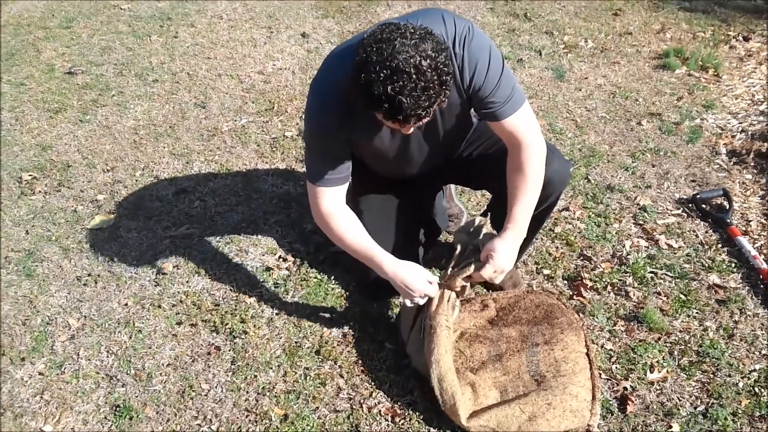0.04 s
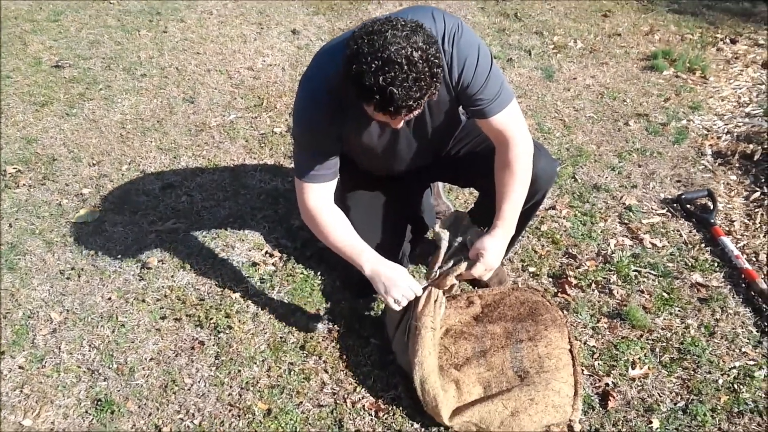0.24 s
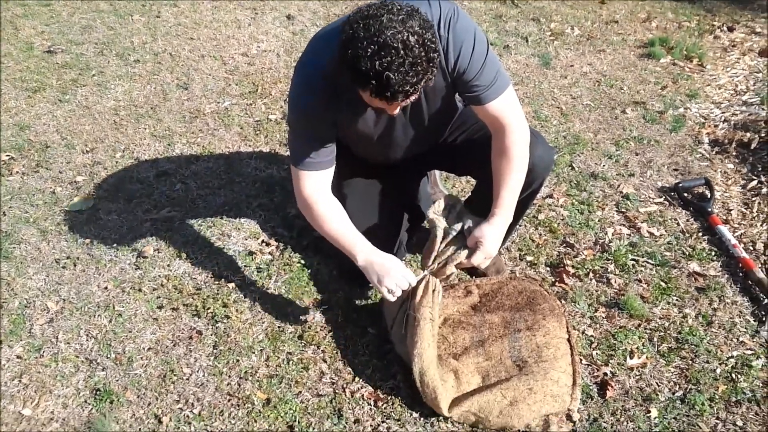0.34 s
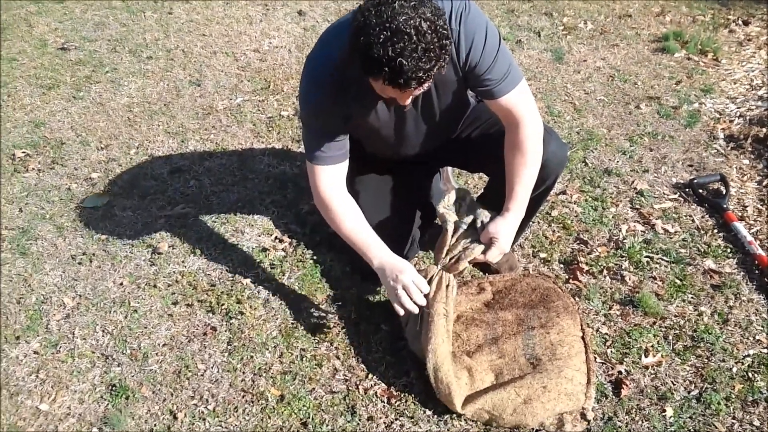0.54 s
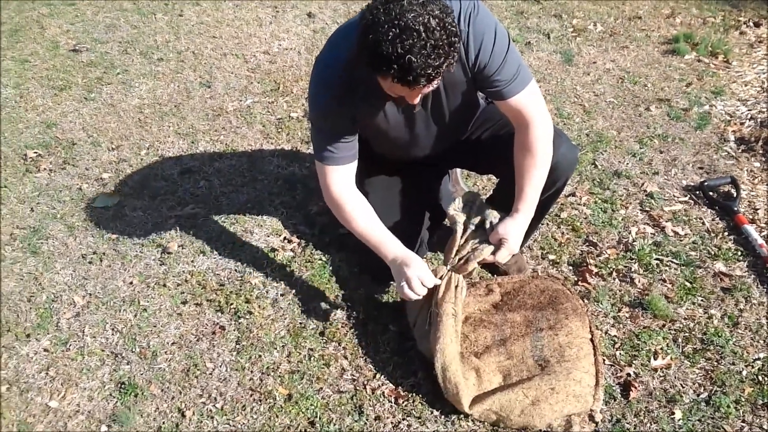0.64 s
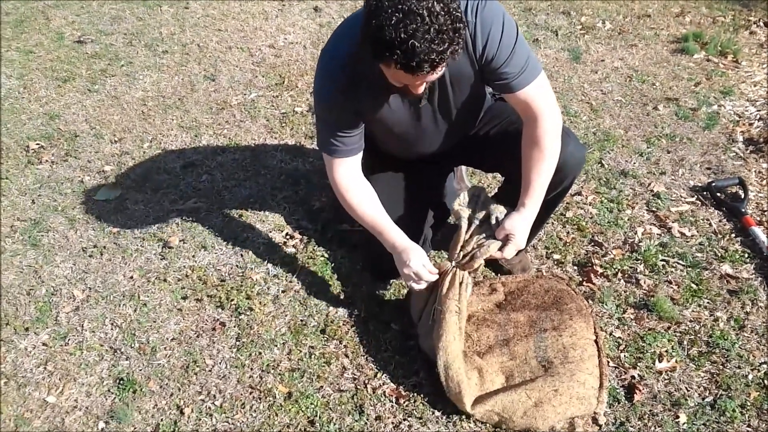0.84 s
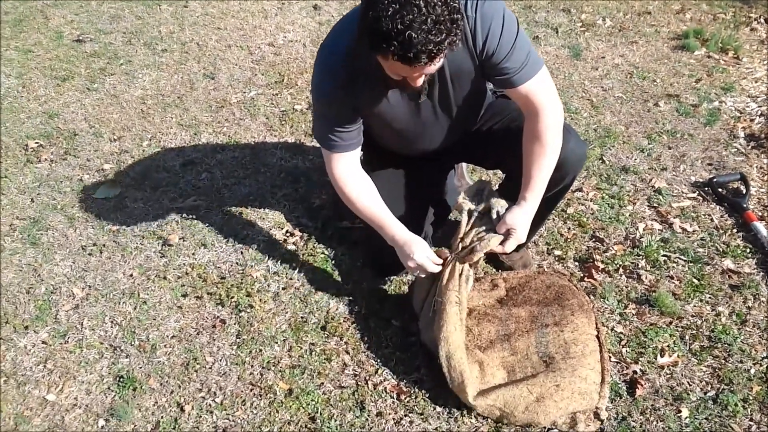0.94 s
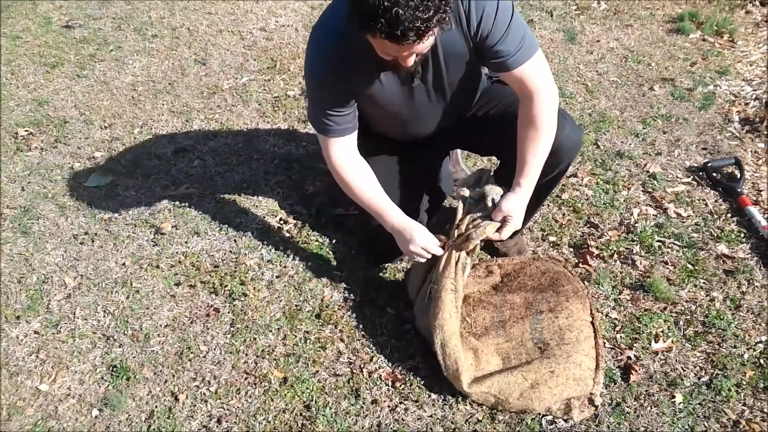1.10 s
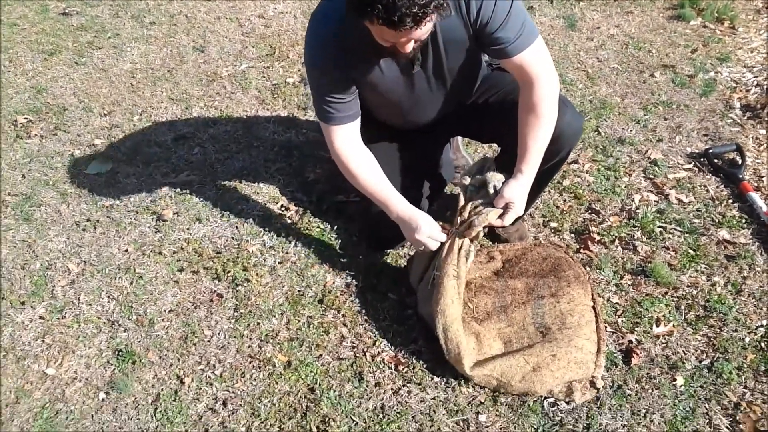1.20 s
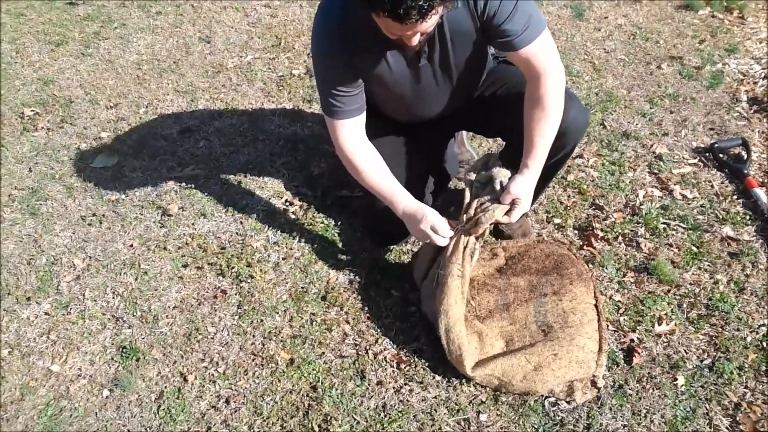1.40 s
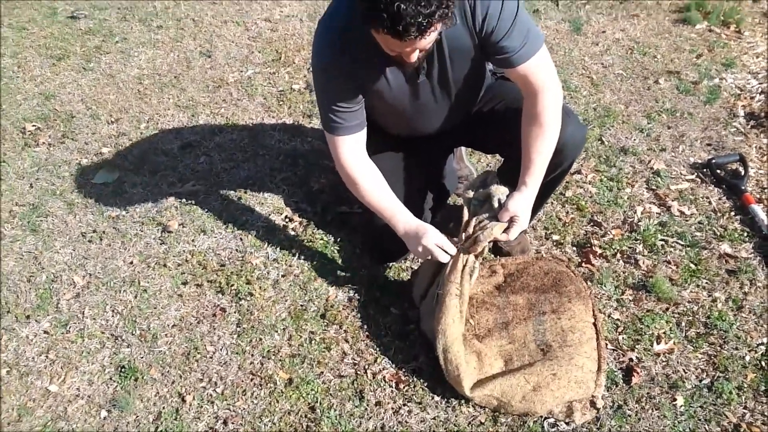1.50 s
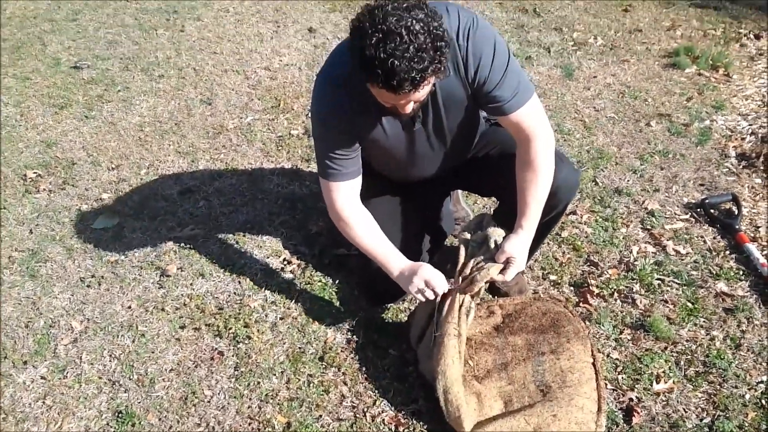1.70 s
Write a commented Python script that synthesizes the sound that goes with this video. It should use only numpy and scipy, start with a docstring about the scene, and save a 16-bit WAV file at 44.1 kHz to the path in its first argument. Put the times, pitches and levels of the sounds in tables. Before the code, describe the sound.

Two hard, hollow knocks hit the microphone on the left at about 0.2 and 0.3 seconds, with a rub along its body until 0.5. A burlap sack rustles faintly up close throughout, with a few light taps on the microphone. Distant birds whistle and trill from 0.5 seconds, and a nearer bird gives four quick, raspy chirps between 1.0 and 1.5, the last very faint. A light breeze rumbles underneath.

```python
"""Two hard knocks ring the microphone's housing while a burlap sack is gathered and tied on dry grass.
Something rubs along the housing's left side; then the cloth rustles faintly, fibre slipping over fibre,
with a few light taps on the housing. Birds whistle, trill and slur, echoing among the trees,
and a light breeze rumbles on the microphone."""
import sys
import numpy as np
from scipy import signal
from scipy.fft import rfft, irfft
from scipy.io import wavfile

SR = 44100
rng = np.random.default_rng(int(sys.argv[2]) if len(sys.argv) > 2 else 0)


def wrap_up_sound(samples):
    """Save the sound to the file named by the first command line argument, as 16-bit audio."""
    columns = np.atleast_2d(samples).T
    # keep every value between -1 and 1, then stretch to whole-number steps
    tamed = np.clip(columns, -1, 1)
    steps = np.round(tamed * 32767).astype(np.int16)
    wavfile.write(sys.argv[1], SR, steps)


N = 77175
T = np.arange(N) / SR
CUTOFF_HZ = 15900


def from_db(db):
    """Decibels to gain."""
    return 10 ** (np.asarray(db) / 20)


def rms_one(x):
    """Scale to an rms of 1."""
    return x / np.sqrt(np.mean(x ** 2) + 1e-20)


def in_time(rows, t=T):
    """Join timed breakpoints by straight lines: one curve for each column after the time."""
    times, *columns = np.transpose(rows)
    return [np.interp(t, times, column) for column in columns]


def panned(left_db):
    """Constant-power stereo gains, the left louder than the right by left_db."""
    ratio = from_db(np.atleast_1d(left_db))
    return np.array([ratio, np.ones_like(ratio)]) * np.sqrt(2 / (1 + ratio ** 2))


def drift(per_s):
    """A random wander of rms 1 that heads for a new value per_s times a second."""
    points = rng.standard_normal(4000)
    return rms_one(np.interp(T * per_s, np.arange(len(points)), points))


def coloured(x, colour):
    """Shape a signal with an EQ curve, rolled off below 20 Hz; rms 1."""
    hz, db = np.transpose(colour)
    bins_hz = np.maximum(np.fft.rfftfreq(N, 1 / SR), 1)
    gain = from_db(np.interp(np.log(bins_hz), np.log(hz), db))
    return rms_one(irfft(rfft(x) * gain * bins_hz / np.hypot(bins_hz, 20), N))


def noise(shared):
    """Stereo white noise with a share of its power common to both sides."""
    return np.sqrt(shared) * rng.standard_normal(N) + np.sqrt(1 - shared) * rng.standard_normal((2, N))


def grains(per_s, spread_db):
    """Friction as tiny slips of uneven size, partly shared by both channels."""
    shape = (3, N)  # left, right, centre
    size = from_db(spread_db * np.minimum(rng.exponential(1, shape), 5))
    slips = (rng.random(shape) < per_s / SR) * size * rng.choice([-1, 1], shape)
    return slips[:2] + .5 * slips[2]


def decay(start, t60):
    """An envelope that jumps to 1 at start and falls 60 dB in t60 seconds."""
    return (T >= start) * from_db(-60 * np.clip((T - start) / t60, 0, 4))


def ring(start, hz, t60):
    """A struck mode; low modes start a little later."""
    onset = start + 0.023 / hz
    return np.sin(2 * np.pi * hz * (T - onset)) * decay(onset, t60)


def tree_echoes(x, t60, build_s=0.004):
    """Diffuse echoes from the trees, different on each side."""
    tail = rng.standard_normal((2, N)) * decay(0, t60) * (1 - np.exp(-T / build_s))
    return signal.fftconvolve(x[None], tail / np.sqrt(np.sum(tail ** 2) / 2), axes=1)[:, :N]


def rumble_and_air():
    """Low rumble on the microphone: the rub's left-side bumps, then light gusts, over quiet open air."""
    # The rumble's envelope. Each row: time in seconds, level in dB, left over right in dB.
    envelope = [(0, -60.5, 2), (0.19, -60, -1), (0.30, -35, 22), (0.375, -34, 18), (0.42, -50.5, -8),
                (0.51, -52, -0.5), (0.58, -52.5, 2), (0.68, -54.5, 1), (1.0, -55, 9), (1.1, -48.5, 0),
                (1.21, -44, 7.5), (1.35, -59.5, 3), (1.61, -52, 9.5), (1.675, -34.5, 13), (1.715, -50.5, 2),
                (1.75, -59, 4.5)]
    # EQ curves of the rumble and of the air. Each row: frequency in Hz, gain in dB.
    rumble_colour = [(20, -0.5), (55, 4.5), (85, 1), (125, -5.5), (180, -11.5), (300, -26.5), (700, -37.5),
                     (2000, -68), (16000, -104.5)]
    air_colour = [(30, -13.5), (120, 10), (250, 7.5), (500, 4), (1000, -6), (2000, -13), (4500, -11.5),
                  (8000, -11.5), (11000, -11.5), (16000, -13)]
    db, left_db = in_time(envelope)
    rumble = from_db(db) * panned(left_db) * coloured(noise(shared=.45), rumble_colour)
    air = from_db(-64) * coloured(noise(shared=0.067), air_colour)
    return rumble + air


def burlap():
    """Coarse fibres slip over each other in strokes that swell and fade."""
    # Strokes of the cloth. Each row: peak time in seconds, level in dB, rise and fall in seconds,
    # left over right in dB.
    strokes = [(0.011, -51.5, 0.017, 0.041, -1), (0.15, -46.5, 0.0024, 0.011, 3.5),
               (0.172, -49, 0.0026, 0.013, 4), (0.344, -50, 0.067, 0.099, -2.5),
               (0.814, -56.5, 0.018, 0.069, -3.5), (0.95, -64, 0.037, 0.027, -2),
               (1.071, -56, 0.05, 0.086, -1.5), (1.19, -62.5, .03, 0.058, 3), (1.295, -59, 0.048, 0.04, -2),
               (1.43, -73, .03, 0.027, -7), (1.68, -61, .03, 0.044, -7)]
    # The cloth's EQ curve. Each row: frequency in Hz, gain in dB.
    cloth_colour = [(150, 9), (500, 12.5), (1000, 3), (2000, -2), (3500, -9), (5500, -8.5), (7800, 2.5),
                    (10500, -3), (13000, -4.5), (16000, -5)]
    level = np.zeros((2, N))
    for peak, db, rise, fall, left_db in strokes:
        swell = np.where(T < peak, np.exp(-((T - peak) / rise) ** 2), np.exp(-abs(T - peak) / fall))
        level += from_db(db) * swell * panned(left_db)
    return level * coloured(grains(per_s=6000, spread_db=3.5), cloth_colour)


def housing_knocks():
    """Each knock or tap cracks and sets the housing ringing, mostly on the left; a soft one is dull."""
    # The hits. Each row: start in seconds, levels in dB of the deep mode, hollow mode, shell modes
    # and crack, contact low-pass in Hz, cut on the right in dB.
    hits = [(0.011, -59, -50, -31.5, -55, 580, 44), (0.1432, -45, -52, -48, -40.5, 12000, 16),
            (0.2210, -8, -10.5, -13.5, -9.5, 10200, 24), (0.2715, -43, -49, -19, -38, 1410, 40),
            (0.2799, -15.5, -8.5, 0.5, -4.5, 8300, 23.5), (0.4472, -67, -33.5, -51, -22, 8750, 14),
            (0.4572, -53, -28, -55, -40, 880, 24), (0.4647, -28.5, -47, -44, -29, 13000, 9),
            (0.8014, -47.5, -42.5, -35, -67, 1105, 16), (1.0940, -67, -41.5, -40.5, -61, 1170, 16),
            (1.1400, -46, -35.5, -63, -73, 446, 33), (1.1720, -44, -63, -29, -60, 1080, 18.5),
            (1.2320, -52, -73, -48, -76, 1300, 5), (1.2580, -78, -33, -77, -77, 584, 34),
            (1.2667, -66, -33.5, -75, -98, 594, 29), (1.4100, -51, -41, -70, -72, 590, 27)]
    # The housing's higher modes. Each row: pitch in Hz, level in dB, time to fall 60 dB in seconds,
    # extra cut on the right in dB.
    shell_modes = [(385, -19.5, 0.046, 21.5), (587.7, -7.5, 0.027, -4), (697, -4.5, 0.016, -5.5),
                   (949, -4, 0.017, 1.5), (1164.5, -4, 0.0083, -9), (2040, -6, 0.01, 4),
                   (3000, -23, 0.016, 9)]
    crack_band = signal.butter(1, [1850, 9010], "band", fs=SR, output="sos")
    out = np.zeros((2, N))
    for start, deep_db, hollow_db, shell_db, crack_db, contact_hz, right_cut_db in hits:
        deep = from_db(deep_db) * ring(start, hz=123.7, t60=.11)
        hollow = from_db(hollow_db) * ring(start, hz=240, t60=0.081)
        burst = rng.standard_normal((2, N)) * decay(start, t60=0.0056)
        blow = deep + hollow + from_db(crack_db) * signal.sosfilt(crack_band, burst)
        for hz, db, t60, extra_cut_db in shell_modes:
            blow -= from_db(shell_db + db) * ring(start, hz, t60) * from_db([[0], [-extra_cut_db]])
        contact = signal.butter(4, contact_hz, fs=SR, output="sos")
        out += signal.sosfilt(contact, blow) * from_db([[0], [-right_cut_db]])
    right_lead_s = 0.00015
    return np.array([out[0], np.interp(T + right_lead_s, T, out[1])])


def housing_rub():
    """Dense slips scrape along the housing's left side with a slight flicker in level."""
    # The rub's envelope. Each row: time in seconds, level in dB.
    envelope = [(0.19, -76), (0.222, -40.5), (0.26, -42.5), (0.30, -39), (0.345, -40), (0.37, -40.5),
                (0.405, -36.5), (0.43, -40.5), (0.452, -38), (0.475, -51), (0.51, -62.5), (0.56, -83)]
    # The rub's EQ curve. Each row: frequency in Hz, gain in dB.
    rub_colour = [(60, 5), (120, 5), (170, -1.5), (240, 7), (310, 0.5), (560, -1.5), (1150, -5),
                  (1500, -11.5), (2400, -11), (3600, -15.5), (9300, -11), (12000, -22.5), (16000, -27.5)]
    db, = in_time(envelope)
    flicker_db = .8 * drift(per_s=92)
    scrape = coloured(grains(per_s=20000, spread_db=2.2), rub_colour)
    return from_db(db + flicker_db) * scrape * panned(left_db=11)


def bird_whistles():
    """Birds whistle short, gliding notes; the far ones are mostly echo."""
    # The notes. Each row: start and length in seconds, first and last pitch in Hz, level in dB,
    # echo send in dB.
    notes = [(0.555, 0.031, 2970, 2045, -58, 4.5), (0.52, 0.1, 1470, 1480, -67, 6),
             (0.657, 0.142, 1489, 1460, -69, 7), (0.92, 0.049, 9770, 9870, -55, -38),
             (0.938, 0.023, 4030, 3160, -58.5, 2.5), (0.974, 0.023, 1830, 1880, -73.5, -11.5),
             (1.096, 0.034, 1860, 1826, -64, 3), (1.102, 0.0344, 3055, 2770, -65.5, 7),
             (1.219, 0.021, 1886, 1750, -64, -13.5)]
    direct, send = np.zeros(N), np.zeros(N)
    waver_hz = 65 * drift(per_s=200)
    for start, length, first_hz, last_hz, db, send_db in notes:
        progress = np.clip((T - start) / length, 0, 1)
        hz = first_hz + (last_hz - first_hz) * progress + waver_hz
        note = from_db(db) * np.sin(np.pi * progress) * np.sin(2 * np.pi * np.cumsum(hz) / SR)
        direct += note
        send += from_db(send_db) * note
    return direct + tree_echoes(send, t60=0.87)


def far_bird_trill():
    """A bird's quick, fading run of falling sweeps, blurred by distance."""
    start_s, length_s, sweeps_per_s = .58, .21, 54
    top_hz, bottom_hz, fade_db = 2725, 1824, 8
    progress = (T - start_s) / length_s
    sweep = (T - start_s) * sweeps_per_s % 1
    phase = 2 * np.pi * np.cumsum(top_hz + (bottom_hz - top_hz) * sweep) / SR
    level = (progress > 0) * (progress < 1) * from_db(-62 - fade_db * progress)
    song = level * np.sqrt(np.sin(np.pi * sweep)) * np.sin(phase)
    return song + from_db(4) * tree_echoes(song, t60=0.11)


def near_bird():
    """A near bird sings four up-and-down slurs with a faint octave; fast pitch jitter makes them rasp."""
    # The phrase. Each row: start in seconds, level in dB, pitch ratio.
    slurs = [(0.999, -42, 1.0), (1.122, -40, 0.99), (1.246, -45, 0.99), (1.371, -63.5, 0.98)]
    # One slur's contour. Each row: seconds from its start, pitch in Hz, level in dB, rasp from 0 to 1.
    contour = [(0, 3245, -17, 0.24), (0.017, 3605, -12, 0.26), (0.034, 3813, -1.5, 0.12),
               (0.053, 4050, -6, 0.06), (.066, 3886, -12.5, 0.85), (.074, 3750, -6, .6),
               (.084, 3447, -11.5, 0.4), (0.09, 3250, -28, 0.26)]
    song = np.zeros(N)
    jitter_hz = 336 * drift(per_s=894)
    for start, db, ratio in slurs:
        hz, contour_db, rasp = in_time(contour, T - start)
        phase = 2 * np.pi * np.cumsum(hz * ratio + rasp * jitter_hz) / SR
        tone = np.sin(phase) + from_db(-30.5) * np.sin(2 * phase)
        gate = (T > start) * (T < start + contour[-1][0])
        song += gate * from_db(db + contour_db) * tone
    return (song + from_db(-1) * tree_echoes(song, t60=0.29)) * panned(left_db=4)


def scene():
    """Handling sounds up close, with birds and breeze around them."""
    handling = housing_knocks() + housing_rub() + burlap()
    return handling + near_bird() + bird_whistles() + far_bird_trill() + rumble_and_air()


def record(dry):
    """The deepest rumble is cut, the hardest knock overloads softly, and the top treble is cut."""
    rumble_cut = signal.butter(2, 62, "high", fs=SR, output="sos")
    treble_cut = signal.cheby2(16, 70, CUTOFF_HZ + 800, fs=SR, output="sos")
    trimmed = signal.sosfilt(rumble_cut, dry)
    clipped = trimmed / (1 + (trimmed / .95) ** 4) ** (1 / 4)
    return signal.sosfilt(treble_cut, clipped)


dry = scene()
out = record(dry)
wrap_up_sound(out)
```